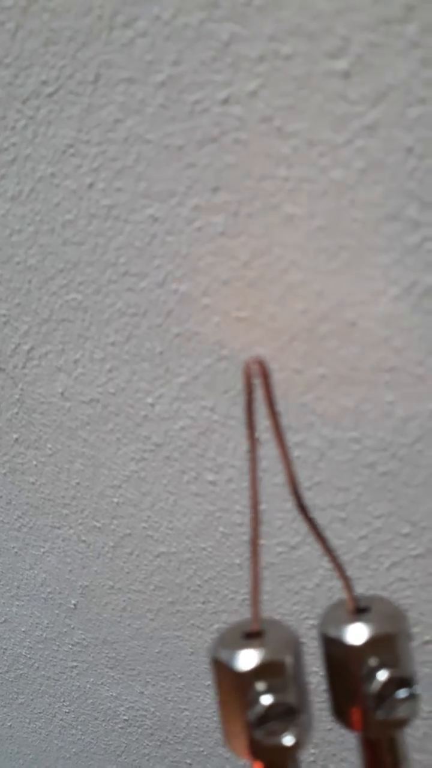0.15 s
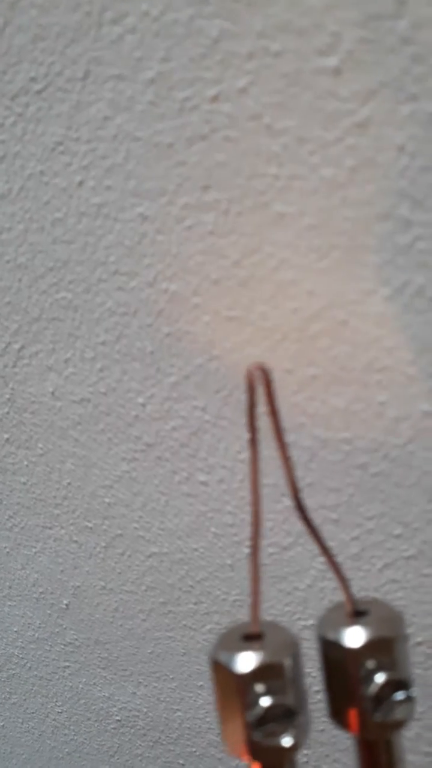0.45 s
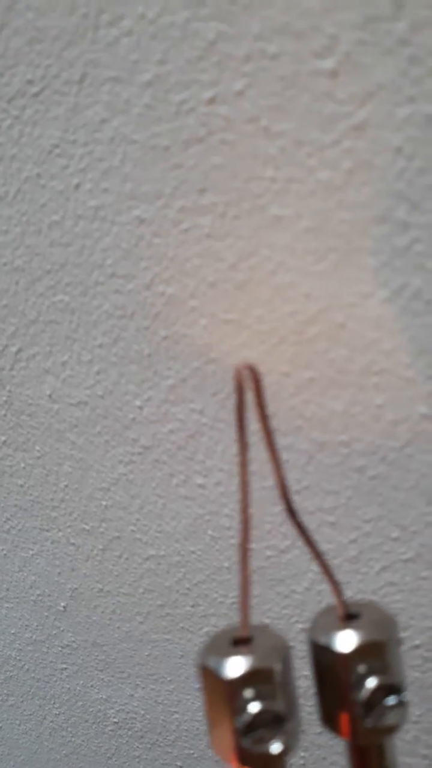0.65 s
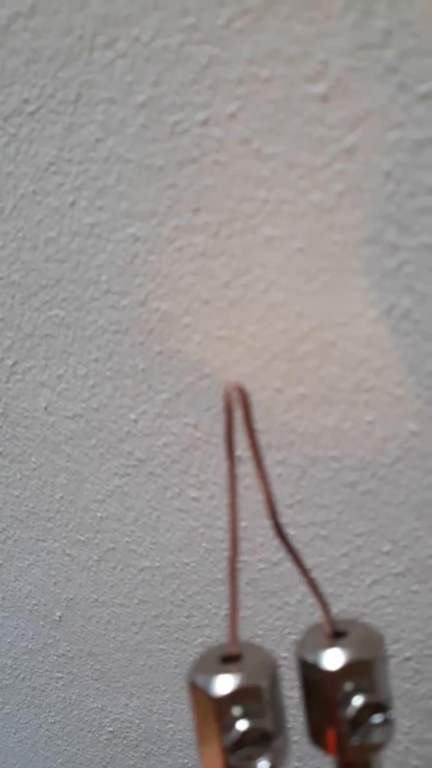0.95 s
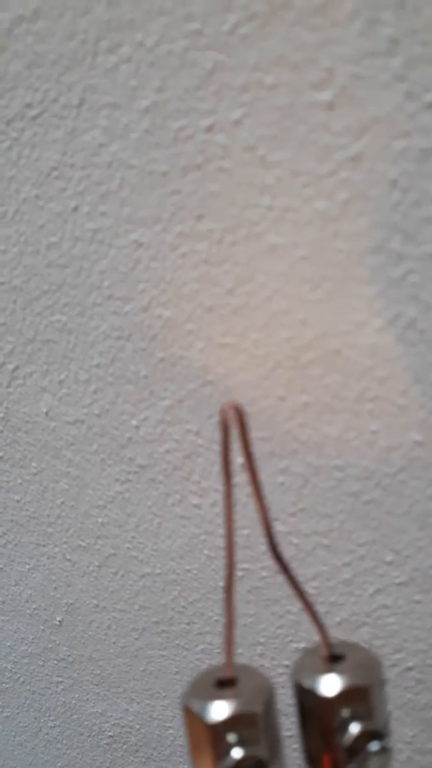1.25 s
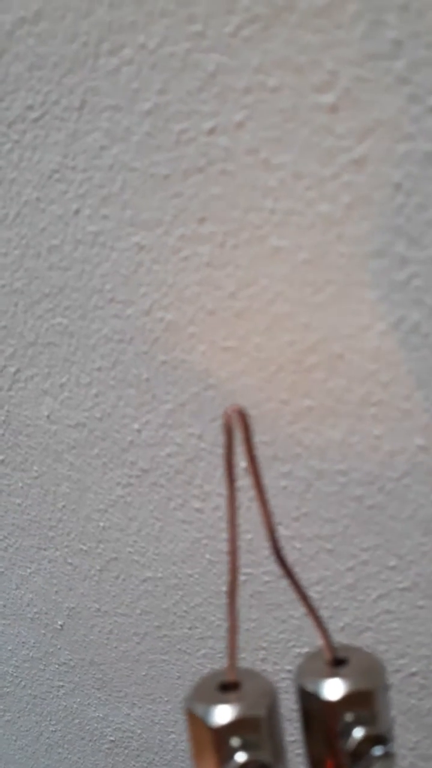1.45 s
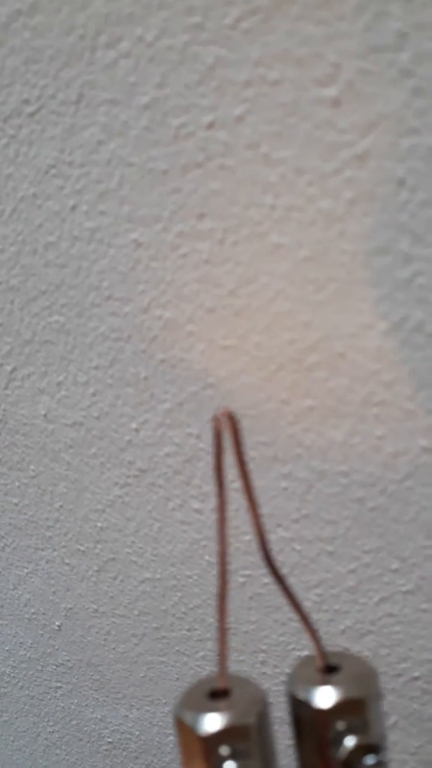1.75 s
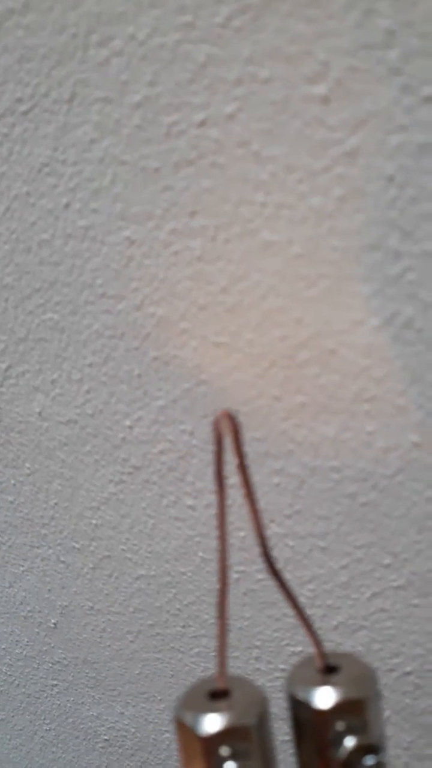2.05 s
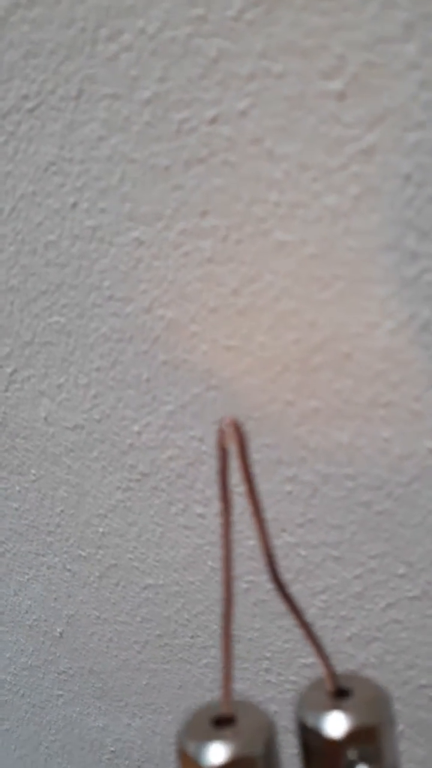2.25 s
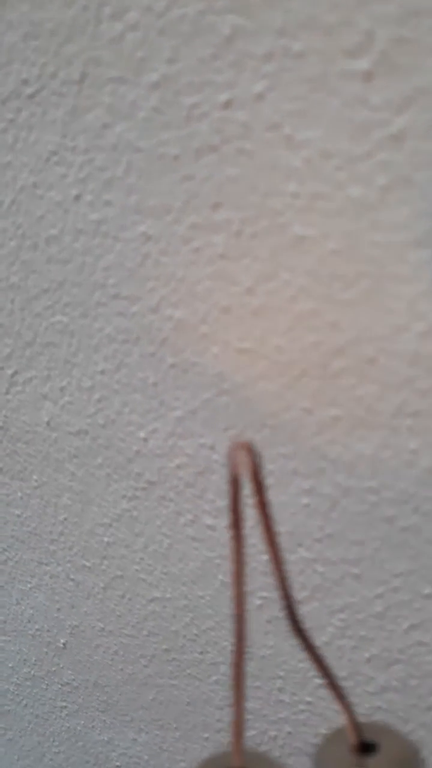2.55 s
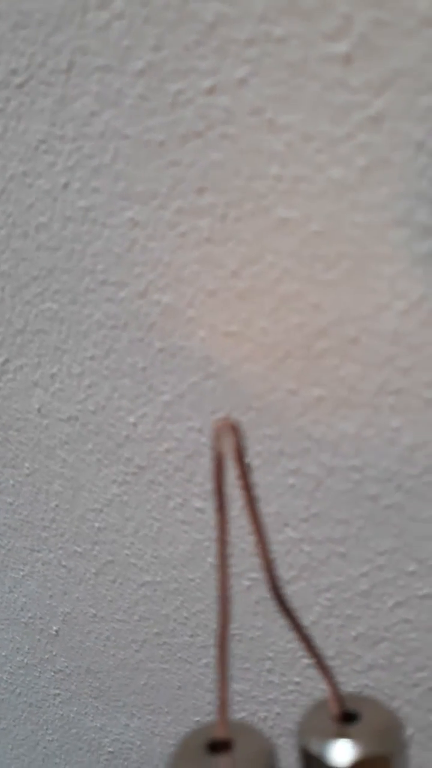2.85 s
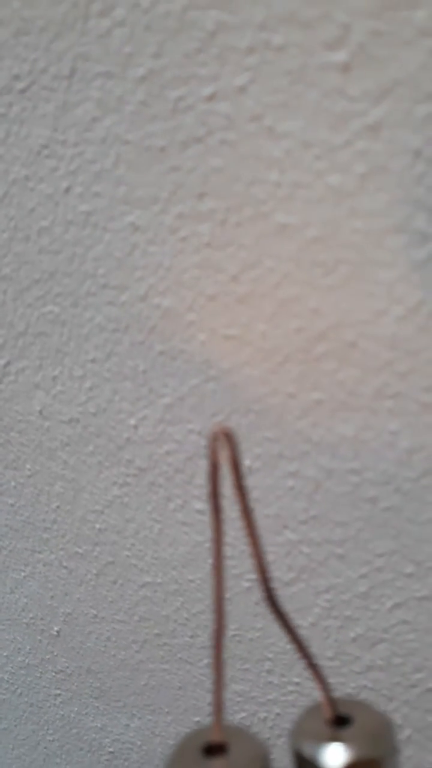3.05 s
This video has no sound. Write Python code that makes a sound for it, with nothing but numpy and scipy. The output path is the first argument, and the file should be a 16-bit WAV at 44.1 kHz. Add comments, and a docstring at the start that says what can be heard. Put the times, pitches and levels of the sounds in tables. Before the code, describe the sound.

A soldering gun's trigger snaps loud and bright at about 0.05 s, with a duller casing knock and soft grip thump at 0.11 s and a brief small-room tail. A far quieter, nasal 100 Hz mains buzz with raspy chatter starts at once, settles around 0.7 s and grows slightly after 1.2 s. Tiny ticks fall near 0.36 and 0.45 s. From about 2.5 s a fine, high sizzle swells until the end at about 3 s. Close microphone, faint room tone.

```python
"""A trigger snaps and knocks in a small room, a harsh buzz settles and grows, and near the end a sizzle starts.
A soldering gun close to a microphone: the switch, casing and grip are struck decaying modes, the transformer
core is a sum of partials at multiples of twice the mains rate plus gated noise of loose laminations, and the
heated tip is a dense train of random pops. Room tone and a little unshared hiss lie beneath."""
import sys
import numpy as np
from scipy import signal
from scipy.fft import rfft, irfft
from scipy.io import wavfile
from scipy.ndimage import uniform_filter1d

SR = 44100
rng = np.random.default_rng(int(sys.argv[2]) if len(sys.argv) > 2 else 0)


def master_out(mix):
    """Clip the mix to full scale and print it as 16-bit PCM to the path in sys.argv[1]."""
    frames = np.transpose(np.atleast_2d(mix))
    ceiling = np.clip(frames, -1, 1)
    pcm = np.round(ceiling * 32767).astype(np.int16)
    wavfile.write(sys.argv[1], SR, pcm)


def undo_db(level):
    """Turn decibels back into plain size, where 20 dB means ten times bigger."""
    steps = np.asarray(level, float) / 20
    return 10 ** steps


N = 141120
T = np.arange(N) / SR
BUZZ_HZ = 100.073
KNOCK_S = .0034  # place of the core's knock within each buzz cycle
# buzz level over time: (time [s], level [dB])
BUZZ_LEVEL = [(0.25, -68), (1.15, -68), (1.29, -64.5), (2.85, -61), (2.87, -62), (3.11, -60.5),
              (3.19, -61.5), (3.2, -63)]


def evened(x):
    """Scales to rms 1."""
    return x / np.sqrt(np.mean(x ** 2) + 1e-20)


def read(points, hz):
    """Reads a (frequency, value) table on a log frequency axis."""
    f, value = np.transpose(points)
    return np.interp(np.log(hz + 1), np.log(f + 1), value)


def curve(points):
    """Joins (time, value) rows with straight lines."""
    return np.interp(T, *np.transpose(points))


def colour(x, points):
    """Filters by a dB spectrum, then scales to rms 1."""
    hz = np.fft.rfftfreq(N, 1 / SR)
    return evened(irfft(rfft(x) * undo_db(read(points, hz)), N))


def highpass(x, order, hz):
    """Butterworth high-pass."""
    return signal.sosfilt(signal.butter(order, hz, "high", fs=SR, output="sos"), x)


def add(mix, s, sound):
    """Mixes a sound in at time s."""
    part = mix[round(s * SR):][:len(sound)]
    part += sound[:len(part)]


def ring(modes, db, tilt_db=0., loose_rad=0.88):
    """One blow on decaying modes, peak near db; tilt is per octave, each blow detunes and dephases them."""
    rise_s, detune_ratio = 0.00011, 0.013
    hz, gain_db, t60_s = np.transpose(modes)[:, :, None]
    t = np.arange(4000) / SR
    detune, turn = rng.standard_normal((2, len(modes), 1))
    decay_db = gain_db + tilt_db * np.log2(hz / hz[0]) - 60 * t / t60_s
    gains = undo_db(decay_db) * (1 - np.exp(-t / rise_s))
    phase = 2 * np.pi * hz * (1 + detune_ratio * detune) * t + loose_rad * turn
    sound = (gains * np.sin(phase)).sum(0)
    return undo_db(db) * sound / np.sqrt((undo_db(gain_db) ** 2).sum())


def background_rise_db():
    """Room tone and hiss rise 0.4 dB per dB of buzz level."""
    return 0.4 * (curve(BUZZ_LEVEL) - BUZZ_LEVEL[0][1])


def room_tone():
    """Coloured noise, heaviest in the bass."""
    # spectrum: (frequency [Hz], density [dB per Hz])
    spectrum = [(25, -27), (45, -7.5), (80, -5.5), (110, 0.5), (150, -3), (220, -9.5), (330, -13),
                (700, -16.5), (1500, -18.5), (2500, -20.5), (4000, -16.5), (8300, -25.5), (16000, -31)]
    start_db = -75
    return colour(rng.standard_normal(N), spectrum) * undo_db(start_db + background_rise_db())


def unshared_hiss():
    """Coloured noise that enters the two channels with opposite signs."""
    # spectrum: (frequency [Hz], density [dB per Hz])
    spectrum = [(25, -12), (60, 3.5), (120, -4), (400, -9.5), (1300, -11), (2500, -16.5), (4000, -7),
                (15800, -10.5)]
    start_db = -82.5
    return colour(rng.standard_normal(N), spectrum) * undo_db(start_db + background_rise_db())


def room(x):
    """Reverberation: sparse taps of random sign, each band dying at its own speed."""
    # decay: (frequency [Hz], t60 [s])
    decay = [(300, 0.23), (1000, 0.29), (4000, 0.28), (8000, 0.29), (14000, 0.23)]
    taps = np.zeros(SR // 2)
    at = np.arange(100, SR // 2 - 20, 6)
    spots = at + rng.integers(0, 6, len(at))
    signs = rng.choice([-1., 1.], len(at))
    taps[spots] = signs * undo_db(3.5 * np.minimum(rng.exponential(1, len(at)), 4))
    hz, t, z = signal.stft(taps, SR, nperseg=256)
    fall = undo_db(-60 * t / read(decay, hz)[:, None])
    tail = signal.istft(z * fall, SR, nperseg=256)[1]
    return signal.fftconvolve(x, tail / np.linalg.norm(tail))[:N]


def sizzle():
    """The heated tip: dense tiny pops of random size and sign in flickering clumps."""
    # level: (time [s], level [dB]), before the fade-in
    level = [(2.2, -83), (2.45, -75), (2.57, -68), (2.61, -63), (2.78, -63), (2.82, -59.5), (2.88, -64.5),
             (3.05, -62.5), (3.09, -65), (3.2, -60.5)]
    # spectrum: (frequency [Hz], density [dB per Hz])
    spectrum = [(2500, -29), (4400, -1.5), (5500, -7.5), (7500, -4), (8700, -10.5), (9600, -20),
                (10700, -10.5), (12800, -11), (13500, -5), (15000, -2), (15600, -3)]
    pops_per_s, spread_db, clump_db, fade_s = 6000, 2., 1.1, .3
    clumps = evened(uniform_filter1d(rng.standard_normal(N), 500))
    size = undo_db(spread_db * np.minimum(rng.exponential(1, N), 4) + clump_db * clumps)
    struck = rng.random(N) < pops_per_s / SR
    pops = size * struck * rng.choice([-1., 1.], N)
    fade = np.clip((T - level[0][0]) / fade_s, 0, 1)
    return colour(pops, spectrum) * undo_db(curve(level)) * fade


def grip_thumps():
    """The held gun thumps on low, slowly dying modes."""
    # grip modes: (frequency [Hz], relative level [dB], t60 [s])
    modes = [(85, -6, .08), (125, -0.5, 0.078), (280, -1.5, 0.034)]
    # blows: (time [s], level [dB])
    thumps = [(.047, -57.5), (0.108, -52)]
    out = np.zeros(N)
    for s, db in thumps:
        add(out, s, ring(modes, db, loose_rad=.1))
    return out


def high_ticks():
    """A faint high tick: three close modes, very short."""
    # ticks: (time [s], level [dB], middle mode [Hz])
    ticks = [(.4455, -59, 12500)]
    out = np.zeros(N)
    for s, db, hz in ticks:
        modes = [(hz * ratio, 0, .004) for ratio in (.9, 1, 1.12)]
        add(out, s, ring(modes, db))
    return out


def casing_knocks():
    """The trigger knocks on the casing modes, and the room answers."""
    # casing modes: (frequency [Hz], relative level [dB], t60 [s])
    modes = [(480, -10, .015), (800, -1, .008), (1100, -4, .006), (1500, -2, .008), (1960, -4, .008),
             (2900, -6, .005), (3850, -2, .007), (5200, -10, .004), (8100, -10, .004), (13000, -16, .003)]
    # blows: (time [s], level [dB], tilt [dB per octave])
    knocks = [(.1058, -27, 0), (.1068, -24, 0), (.1079, -25, 0), (.1094, -30, -1), (.1235, -31, -9),
              (.359, -64, 5)]
    room_db = -12
    out = np.zeros(N)
    for s, db, tilt_db in knocks:
        add(out, s, ring(modes, db, tilt_db, loose_rad=0.19))
    return out + undo_db(room_db) * room(out)


def switch_clatter(snap_s):
    """The main snap fills the room: coloured reverberation of one impulse."""
    # spectrum sent into the room: (frequency [Hz], density [dB per Hz])
    spectrum = [(120, -90), (200, -43.5), (633, -33), (1410, -10), (2000, -13.5), (2490, -20.5), (3730, -4),
                (7740, -18), (10000, -27.5), (14200, -16), (15800, -10)]
    clatter_db = -52
    blow = np.zeros(N)
    add(blow, snap_s, np.ones(1))
    return undo_db(clatter_db) * colour(room(blow), spectrum)


def switch_snaps():
    """The switch snaps over and bounces on its small parts, two faint echoes follow; the room answers the first
    snap."""
    # trigger parts: (frequency [Hz], relative level [dB], t60 [s])
    modes = [(1280, -14, 0.026), (1935, -17.5, 0.041), (3276, -7, 0.018), (3714, 5.5, 0.014),
             (4450, -18.5, 0.0075), (4660, 5.5, 0.01), (5315, 4, 0.013), (5300, -4, .006),
             (7130, 0.5, 0.0049), (8010, -2.5, 0.013), (7500, -5, .006), (11660, -9.5, 0.0099),
             (12400, -0.5, 0.0041), (13560, -2, 0.0094), (14300, -21.5, .012), (15500, -10.5, 0.016)]
    # snap, its bounces and two faint echoes: (time [s], level [dB])
    snaps = [(.0467, -4.5), (.0477, -12), (.0488, -14), (.0735, -31), (.082, -35)]
    out = np.zeros(N)
    for s, db in snaps:
        add(out, s, ring(modes, db))
    return highpass(out, 2, 1094) + switch_clatter(snaps[0][0])


def trigger():
    """Snaps, knocks and tick through thin plastic, which radiates little bass, plus the grip."""
    parts = switch_snaps() + casing_knocks() + highpass(high_ticks(), 2, 1094)
    return highpass(parts, 3, 440) + grip_thumps()


def settled():
    """Near 0 just after switch-on, 1 once the core has settled."""
    settle_s, width_s = 0.72, 0.2
    return .5 + .5 * np.tanh((T - settle_s) / width_s)


def running():
    """Gain of all that the core makes."""
    on_s, rise_s = .047, .02
    return undo_db(curve(BUZZ_LEVEL)) * np.clip((T - on_s) / rise_s, 0, 1)


def chatter():
    """Loose laminations chatter: noise kicked up twice in every buzz cycle, heard through the casing."""
    # spectrum: (frequency [Hz], density [dB per Hz])
    spectrum = [(500, -23), (1000, -9.5), (1300, 0), (1900, 6.5), (2300, -2), (2600, -20), (3100, -11.5),
                (3600, 3.5), (4100, 0.5), (4700, -6), (5600, -23), (6200, -5), (6800, 0), (7300, -9.5),
                (8300, -3), (9400, -26.5), (11000, -9.5), (15700, -8)]
    settled_db, early_extra_db = -7, 0.5  # relative to the buzz level
    gate_depth, fall_turns = 0.3, 0.68
    turn = (2 * BUZZ_HZ * (T - KNOCK_S) + .3) % 1
    gate = 1 - gate_depth + gate_depth * np.exp(-turn / fall_turns) / fall_turns
    noise = colour(gate * rng.standard_normal(N), spectrum)
    return noise * running() * undo_db(settled_db + early_extra_db * (1 - settled()))


def buzz():
    """The core's steady partials, lined up on its knock, each wavering in level and phase."""
    # partials: (multiple of BUZZ_HZ, level after switch-on [dB], level settled [dB]), relative to the buzz level
    partials = [(1, -16, -22), (2, -21, -23), (6, -34, -35), (8, -32, -32), (9, -26, -29), (10, -33, -32),
                (11, -26, -25), (12, -22, -24), (13, -9, -6), (14, -19, -22), (15, -22, -29),
                (16, -20, -20), (18, -6, -7), (19, -6, -7), (20, -7, -6), (21, -23, -18), (22, -21, -20),
                (23, -16, -16), (24, -28, -28), (32, -23, -26), (34, -12, -16), (35, -13, -20),
                (36, -7, -12), (37, -4, -11), (38, -6, -12), (39, -14, -17), (40, -14, -22), (41, -17, -18),
                (42, -26, -16), (43, -12, -27), (44, -23, -28), (46, -24, -28), (47, -24, -28),
                (48, -32, -26), (52, -36, -33), (56, -36, -30), (59, -36, -32), (61, -30, -30),
                (62, -15, -26), (63, -22, -25), (64, -25, -18), (65, -31, -13), (66, -32, -15),
                (67, -22, -22), (68, -21, -20), (69, -12, -23), (70, -21, -30), (71, -32, -32),
                (73, -36, -30), (74, -32, -31), (75, -32, -32), (79, -21, -30), (81, -17, -28),
                (82, -29, -25), (83, -14, -32), (84, -30, -33)]
    # how late each range answers the knock: (frequency [Hz], lag [s])
    lags = [(1000, -.002), (1700, 0), (2200, 0), (2300, .004), (3400, -.002), (3700, -.001), (4300, .029),
            (6400, .029), (6600, .03), (6700, .034), (7000, .034), (8300, .029)]
    waver_db, waver_hz, waver_rad = 1., 12, .13
    k, early_db, late_db = np.transpose(partials)[:, :, None]
    steps = int(N / SR * waver_hz) + 3
    slow = rng.standard_normal((2, len(k), steps))
    level_waver, phase_waver = np.array(
        [[np.interp(T * waver_hz, np.arange(steps), row) for row in part] for part in slow])
    mix = settled()
    gain = (1 - mix) * undo_db(early_db) + mix * undo_db(late_db)
    gain = gain * undo_db(waver_db * level_waver)
    # group delay summed over the multiples gives each partial's phase
    lag = np.cumsum(read(lags, np.arange(k.max() + 1) * BUZZ_HZ))[k.astype(int)]
    turns = BUZZ_HZ * (k * (T - KNOCK_S) - lag)
    waves = gain * np.cos(2 * np.pi * turns + waver_rad * phase_waver)
    return np.sqrt(2) * running() * waves.sum(0)


def scene():
    """All sources alike in both channels, with a little unshared hiss between them."""
    mid = room_tone() + sizzle() + trigger() + chatter() + buzz()
    hiss = unshared_hiss()
    return np.array([mid + hiss, mid - hiss])


def roll_off(x):
    """The treble ends steeply here."""
    return signal.sosfilt(signal.butter(12, 16570, fs=SR, output="sos"), x)


def record(dry):
    """Band limit at 15.8 kHz by a linear-phase low-pass."""
    edge = signal.firwin(511, 15800, window=("kaiser", 9), fs=SR)
    mix = signal.oaconvolve(dry, edge[None], "same")
    return roll_off(mix)


dry = scene()
out = record(dry)
master_out(out)
```